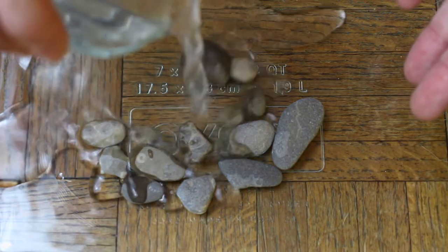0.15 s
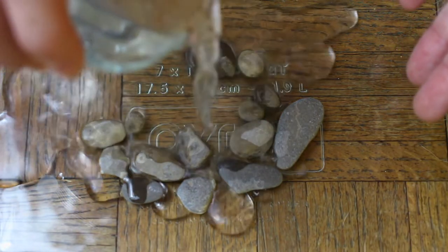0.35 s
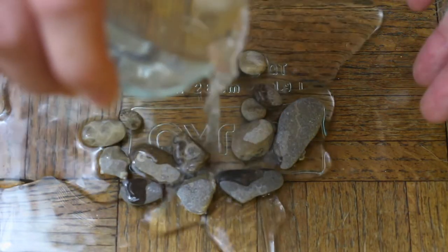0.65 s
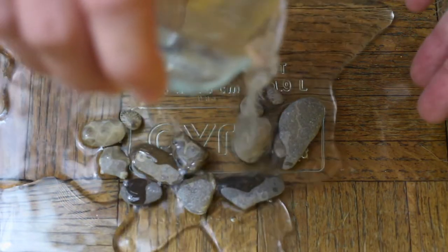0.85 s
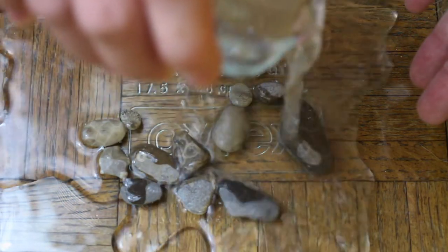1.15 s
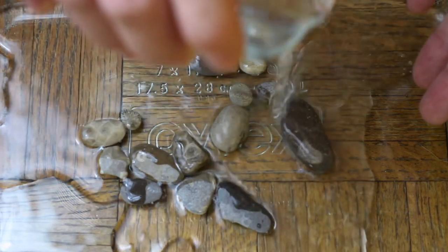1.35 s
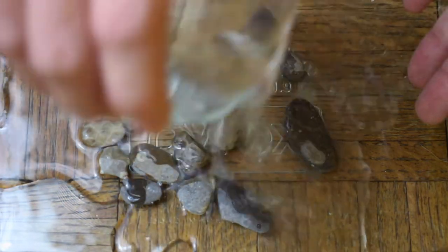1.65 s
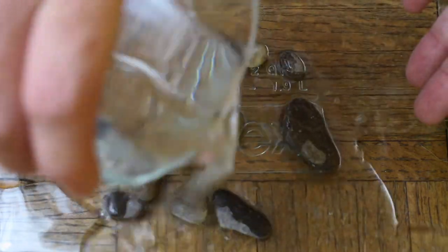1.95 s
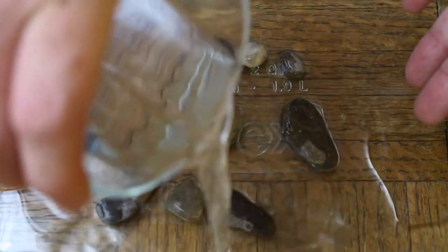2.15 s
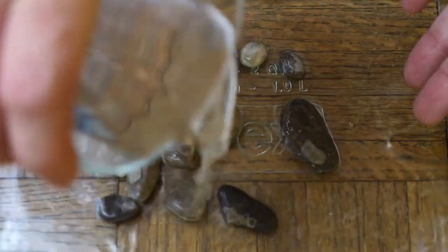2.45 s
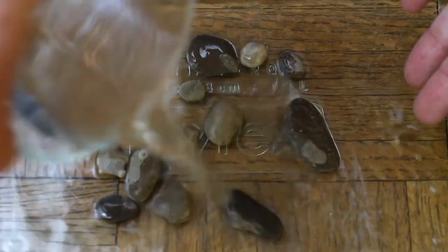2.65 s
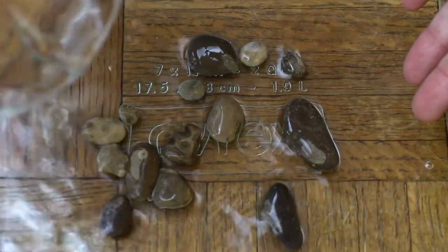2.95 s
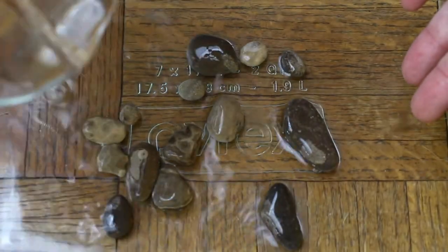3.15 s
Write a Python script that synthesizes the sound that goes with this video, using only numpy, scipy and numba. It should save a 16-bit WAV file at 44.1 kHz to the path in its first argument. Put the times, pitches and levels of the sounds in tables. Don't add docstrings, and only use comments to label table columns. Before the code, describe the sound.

Pebbles clink and knock in a glass dish as poured water splashes over them, close up indoors

```python
import sys
import numpy as np
from scipy import signal
from scipy.fft import rfft, irfft
from scipy.io import wavfile
from scipy.ndimage import uniform_filter1d
from numba import njit

SR = 44100
rng = np.random.default_rng(int(sys.argv[2]) if len(sys.argv) > 2 else 0)


def voltage_ratio(level):
    return 10 ** (np.asarray(level, float) / 20)


def wav_out(sig):
    wavfile.write(sys.argv[1], SR, np.round(np.clip(np.atleast_2d(sig).T, -1, 1) * 32767).astype(np.int16))


N = 145530
TOP_HZ = 15900


def unit(x):
    return x / np.sqrt(np.mean(x ** 2))


def walk(rate_hz):
    hold = int(SR / rate_hz)
    steps = np.repeat(rng.standard_normal(N // hold + 1), hold)
    return unit(uniform_filter1d(uniform_filter1d(steps, hold), hold)[:N])


def colour(x, points):
    hz, db = np.array(points, float).T
    bin_hz = np.arange(N // 2 + 1) * SR / N
    return irfft(rfft(x) * voltage_ratio(np.interp(np.log(bin_hz + 1), np.log(hz), db)), N)


def ring(x, hz, width_hz, wander=0):
    turn = np.exp(2j * np.pi * hz * np.cumsum(1 + wander + 0 * x) / SR)
    decay = np.exp(-np.pi * width_hz / SR)
    return (signal.lfilter([1], [1, -decay], x / turn) * turn).imag


def clicks(rate_hz, spread_db):
    chance, size, sign = rng.random((3, N))
    return unit((chance < rate_hz / SR) * voltage_ratio(-spread_db * np.log(size + 1 / 100)) * np.sign(sign - .5))


@njit
def grains(start, hz, cycles, glide, size, length):
    out = np.zeros(length)
    for k in range(len(start)):
        n, phase, a = cycles[k] * SR / hz[k], 0., size[k]
        fade = np.exp(-1 / n)
        for i in range(min(int(6 * n), length - start[k])):
            out[start[k] + i] += a * np.sin(phase) * min(1., 5 * i / n)
            phase += 2 * np.pi * min(hz[k] * (1 + glide[k] * i / n) / SR, .45)
            a *= fade
    return out


# start in
# seconds, peak in dB, spot (0 back to 2 front), skid in seconds.
KNOCKS = [(0.0667, -13, 0.17, 0.027), (0.0784, -17, 0.082, 0.003), (0.1258, -21, 0.046, 0.014),
          (0.169, -18, 0.067, 0.01), (0.191, -19, 0.13, 0.017), (0.2234, -13.5, 0.067, 0.0061),
          (0.2711, -11, 0.067, 0.0033), (0.2967, -12.5, 0.065, 0.0047), (0.3147, -13.5, 0.2, 0.015),
          (0.4533, -15, 0.12, 0.013), (0.5277, -16, 0.085, 0.0099),
          (0.77, -14, 0.18, 0.011), (0.7931, -15, 1.2, 0.027), (0.8222, -6.5, 0.13, 0.013),
                 (0.8504, -6, 0.19, 0.012), (1.061, -11.5, 1.13, 0.02), (1.0796, -15.5, 1.06, 0.023),
                 (1.1014, -11.5, 0.97, 0.0096), (1.1164, -11, 0.97, 0.036), (1.1692, -12.5, 1.2, 0.0033),
                 (1.3971, -6, 0.9, 0.035), (1.415, -11, 0.55, 0.0036), (1.4294, -9, 0.81, 0.028),
                 (1.5387, -16.5, 1.26, 0.029), (1.5799, -12, 1.44, 0.018), (1.6377, -31, 2.2, 0.0071),
                 (1.6545, -8, 0.58, 0.018), (1.67, -11, 0.92, 0.018), (1.707, -13.5, 0.51, 0.0089),
          (1.8867, -19, 6.4, 0.012), (1.9188, -17.5, 1.6, 0.0076), (2.0797, -13, 1.4, 0.016),
               (2.1256, -11, 1.67, 0.011), (2.15, -14, 2.1, 0.0051), (2.225, -19.5, 1.6, 0.0037),
               (2.2603, -14.5, 1.13, 0.0049), (2.2981, -11, 1.43, 0.0086), (2.3343, -8.5, 1.06, 0.014),
               (2.366, -19.5, 1, 0.025), (2.417, -8, 2.1, 0.041), (2.459, -5, 1.9, 0.023),
               (2.5404, -17, 2.5, 0.013), (2.5709, -14, 2.03, 0.0098), (2.669, -13.5, 1.87, 0.018),
               (2.746, -7, 1.96, 0.0092), (2.7744, -11.5, 0.93, 0.0076), (2.8008, -7, 0.88, 0.033),
               (2.8388, -5, 2.2, 0.011),
          (2.901, -16.5, 0.72, 0.056),
    (2.9297, -13.5, 0.95, 0.032),
]
# start in seconds, peak in dB.
TAPS = [(0.2098, -18.5), (0.2428, -14), (0.355, -16.5), (0.392, -11), (0.4835, -14.5), (0.5192, -11.5),
        (0.6861, -20.5), (0.7195, -25.5), (0.9363, -21), (1, -34), (1.031, -31), (1.2612, -26.5),
        (1.4527, -17), (1.4739, -14.5), (1.492, -18.5), (1.5068, -17), (1.5669, -10.5), (1.691, -18),
        (1.7592, -17), (1.96, -24), (1.9968, -18), (2.0328, -21.5), (2.1869, -21), (2.2064, -24),
        (2.6407, -11.5), (2.6912, -12)]


def pebble_contacts(t):
    s, db, spot, slide_s = np.array(KNOCKS, float).T
    tap_s, tap_db = np.array(TAPS, float).T
    skid_spot, tap_spot = np.interp(t, s, spot), np.interp(tap_s, s, spot)
    s, db = np.r_[s, tap_s], np.r_[db, tap_db - 2.5]
    spot, slide_s = np.r_[spot, tap_spot], np.r_[slide_s, 0.011 + 0 * tap_s]
    return s, db, spot, slide_s, skid_spot


def skid_push(t, skid_db, s, db, slide_s):
    push = voltage_ratio(skid_db - 6.5)
    for start, level_db, hold_s in zip(s, db, np.clip(slide_s, 1e-3, .1)):
        attack = np.clip((t - start) / 0.0044, 0, 1)
        push = push + voltage_ratio(level_db - 12.5) * attack * np.exp(-(np.abs(t - start) / hold_s) ** 2)
    return push


# Hz, width in Hz, level in dB.
SPOT_BACK = [(1930, 260, -5.5), (2876, 52, -8.5), (3850, 29, -8), (5025, 46, 2), (6040, 81, -6.5),
             (7160, 84, -14), (8000, 88, -16.5)]
# Hz, width in Hz, level in dB.
SPOT_MIDDLE = [(1884, 80, -1), (2900, 78, -2.5), (3138, 47, -1), (4616, 36, 1.5), (4840, 86, -1),
               (5750, 30, -3), (6554, 58, -1), (7180, 200, -3.5), (7990, 70, -2.5), (9230, 24, -12.5),
               (10050, 98, -9.5)]
# Hz, width in Hz, level in dB.
SPOT_FRONT = [(1894, 78, 0.5), (3114, 43, 6.5), (4511, 48, -0.5), (5473, 64, -4.5), (6040, 31, -7.5),
              (6980, 69, -8), (10170, 270, -23), (9660, 36, -18), (11300, 80, -16), (14000, 100, -16)]
# Hz, width in Hz, level in dB.
FLEX = [(265.5, 56, -9.5), (749, 116, -5.5), (1087, 26, -1.5), (2194, 135, -0.5)]


def dish_modes(skid, patter, push, skid_spot, at, tick_db, spot):
    knock_db, scatter_db = 2.5, 3
    chance = rng.standard_normal((len(at), 48))
    out, k = np.zeros(N), 0
    for place, modes in enumerate((SPOT_BACK, SPOT_MIDDLE, SPOT_FRONT, FLEX)):
        if place < 3:
            skid_share, knock_share = (
                np.sqrt(np.clip(1 - abs(np.clip(p, 0, 2) - place), 0, 1)) for p in (skid_spot, spot))
        else:
            skid_share, knock_share = (np.mean(push) / push) ** 0.43, 0.3
        for hz, width_hz, mode_db in modes:
            drive = skid * voltage_ratio(3.02 * walk(18)) + patter * voltage_ratio(scatter_db * rng.standard_normal(N))
            drive = drive * 0.14 * skid_share
            knock = voltage_ratio(tick_db + knock_db + scatter_db * chance[:, k]) * np.sign(chance[:, k - 1])
            drive[at] += knock_share * knock
            mode = np.gradient(ring(drive, hz, width_hz, 0.0038 * walk(9))) / np.sin(2 * np.pi * hz / SR)
            out += voltage_ratio(mode_db - 29) * np.sqrt(width_hz) * mode
            k += 1
    return out


# start in seconds, peak in dB, Hz.
CLINKS = [
    (0.0034, -25.5, 3480),
    (2.8976, -11, 4840),
    (3.023, -23.5, 4790),
]


def clinks():
    out = np.zeros(N)
    for s, db, hz in CLINKS:
        out += voltage_ratio(db) * ring(1. * (np.arange(N) == int(s * SR)), hz, 43)
    return out


# Hz, level in dB.
CLATTER_COLOUR = [(600, -18), (2500, -3), (5000, 0), (9000, -9), (16000, -22)]


def clatter(hit_power):
    t60_s = 0.12
    power = signal.lfilter([1], [1, -1e-6 ** (1 / (t60_s * SR))], hit_power)
    return voltage_ratio(-21.5) * np.sqrt(np.abs(power)) * unit(colour(rng.standard_normal(N), CLATTER_COLOUR))


def fine_modes(t, drive):
    count, t60_s = 70, .05
    u = t[:SR // 10]
    pitch, phase, decay = rng.random((count, 3)).T[:, :, None]
    modes = np.sin(2 * np.pi * (TOP_HZ * pitch * u + phase)) * voltage_ratio(-60 * u / (t60_s * (.5 + decay)))
    kernel = modes.sum(0)
    fine = signal.fftconvolve(drive, kernel / np.sqrt(np.sum(kernel ** 2)))[:N]
    return voltage_ratio(-8.5) * colour(fine, CLATTER_COLOUR)


def dish(t, skid_db):
    flooded_s, tick_db_per_s = 2.4, -150
    s, db, spot, slide_s, skid_spot = pebble_contacts(t)
    at = (s * SR).astype(int)
    push = skid_push(t, skid_db, s, db, slide_s)
    skid = clicks(1300, 3.5) * push * voltage_ratio(walk(60))
    patter = clicks(200, 2) * voltage_ratio(skid_db - 5.5)
    tick_db = db + tick_db_per_s * slide_s * np.where(s > flooded_s, 3, .6)
    hit_power = np.zeros(N)
    hit_power[at] = voltage_ratio(tick_db) ** 2
    out = dish_modes(skid, patter, push, skid_spot, at, tick_db, spot) + clinks() + clatter(hit_power)
    return out + fine_modes(t, skid + patter + 5 * np.sqrt(hit_power))


def swarm(rate_hz, low_hz, high_hz, cycles, glide, spread_db):
    when, pitch, length, size = rng.random((int(rate_hz * N / SR), 4)).T
    return unit(grains((when * N).astype(np.int64), low_hz * (high_hz / low_hz) ** pitch,
                       cycles * (.5 + length), glide + 0 * when,
                       voltage_ratio(-spread_db * np.log(size + 1 / 50)), N))


# start in seconds, peak in dB, Hz.
SNAPS = [(0.1705, -5.5, 8660), (0.1914, -10, 8820), (0.2857, -31, 12100), (0.3144, -18, 9660),
         (0.3426, -17.5, 12500), (0.3739, -17, 10000), (0.395, -17, 10700), (0.414, -20, 10400),
         (0.454, -16.5, 12000), (0.478, -23, 10200), (0.5111, -13.5, 10300), (0.5822, -19.5, 9450),
         (0.6303, -21, 10500), (0.79, -25, 8500), (0.803, -29, 10200), (0.8884, -25, 13700),
         (0.974, -13.5, 12400), (1.1618, -18, 10400), (1.186, -27, 9170), (1.2271, -34, 14800),
         (1.2615, -22, 9180), (1.3049, -14.5, 11200), (1.3278, -22, 12900), (1.357, -27, 12500),
         (1.3725, -15, 15700), (1.3911, -26, 10200), (1.43, -11, 9180), (1.497, -14.5, 11100),
         (1.524, -19, 14000), (1.6212, -56, 14900), (1.6362, -14.5, 11100), (1.6681, -25, 10200),
         (1.7062, -13, 11540), (1.7619, -15, 11400), (1.881, -25, 9900), (1.9765, -21.5, 13300),
         (2.0052, -19, 12000), (2.0308, -20, 11100), (2.046, -20, 11200), (2.0572, -20, 9200),
         (2.139, -20, 13200), (2.6404, -26, 9980), (2.832, -13.5, 9500), (2.8664, -14, 9520),
         (3.1448, -34.5, 10800)]


def snaps():
    spread_s, cycles = .002, 3
    s, db, hz = np.array(SNAPS, float).T[:, :, None]
    delay, pitch, size = rng.random((len(s), 3, 5)).transpose(1, 0, 2)
    start = ((s + spread_s * delay ** 2) * SR).astype(np.int64)
    ring_hz = np.clip(hz * 1.64 ** (2 * pitch - 1), 4e3, 16e3)
    level = voltage_ratio(db + 1 - 2.5 * size)
    flat = 0 * delay.ravel()
    rings = grains(start.ravel(), ring_hz.ravel(), cycles + flat, flat, level.ravel(), N)
    puff = np.zeros(N)
    puff[(s * SR).astype(int)] = voltage_ratio(db - 14)
    hiss = unit(colour(rng.standard_normal(N), [(2500, -40), (7000, 2), (16000, 4)]))
    return rings + hiss * signal.lfilter([1], [1, -np.exp(-1 / (0.0046 * SR))], puff)


# start in seconds, peak in dB, nominal Hz (the chirp starts at 0.85 of it).
BUBBLES = [(0.313, -15, 1600), (0.577, -28, 240), (0.49, -13, 1900), (0.526, -6.5, 2500), (0.41, -12, 4100),
           (0.458, -15, 1900), (2.258, -32, 2500), (1.4145, -7, 5100), (1.4, 0.5, 4900), (1.6, -6, 5200),
           (2.109, -12, 1790), (2.807, -10, 1880), (2.959, -15.5, 1150), (3.009, -10, 2400),
           (3.041, -22, 2100)]


def large_bubbles():
    s, db, hz = np.array(BUBBLES, float).T
    return grains((s * SR).astype(np.int64), .85 * hz, 7.4 + 0 * s, 0.103 + 0 * s, voltage_ratio(db - 6.0), N)


# time in seconds, level in dB.
GURGLE = [
    (1.17, -73),
    (1.2, -42.5),
    (1.38, -38.5),
    (1.41, -77),
]


def gurgle(t):
    pocket_hz = 2394
    level_db = np.interp(t, *np.array(GURGLE).T)
    return swarm(170, 0.95 * pocket_hz, 1.01 * pocket_hz, 7.4, 0.0091, .6) * voltage_ratio(level_db)


def water(t, flow_db, spray_db):
    fizz_hz = 2600
    spray = swarm(260, 5150, 18800, 3.0, 0.078, 3.5) * voltage_ratio(spray_db - 7.5 + walk(16.3))
    fizz = swarm(150, fizz_hz / 2, fizz_hz * 2, 5, 0.06, 3) * voltage_ratio(flow_db - 13)
    return spray + fizz + snaps() + large_bubbles() + gurgle(t)


# time in seconds, pebble skid level in dB, spray level in dB.
SKID = [(0, -47, -31), (0.048, -43, -60), (.18, -28, -28.5), (.53, -26.5, -62), (0.601, -33.5, -36),
        (0.758, -38.5, -49), (0.899, -31, -31.5), (1.202, -46, -34.5), (1.38, -37, -39), (1.5, -31, -36),
        (1.76, -27, -55), (1.819, -36.5, -41), (2.45, -37.5, -67), (2.949, -24, -54), (3.0, -38.5, -40),
        (3.3, -113, -83)]


def pour(t):
    s, skid_db, spray_db = np.array(SKID, float).T
    skid_db, spray_db = np.interp(t, s, skid_db), np.interp(t, s, spray_db)
    return dish(t, skid_db) + water(t, skid_db, spray_db)


def room_echo(t, near):
    t60_s = .16
    u = t[:SR // 2]
    echo = rng.standard_normal((2, len(u))) * 0.0015 ** (u / t60_s) * (u > .003)
    return [signal.fftconvolve(near, e / np.sqrt(np.sum(e ** 2)))[:N] for e in echo]


# time in seconds, Hz, level in dB.
ENGINE = [
    (2.399, 84.7, -110),
    (2.45, 88.9, -50.5),
    (2.6, 99.6, -48.5),
    (2.901, 95.7, -49.5),
    (3.02, 80.6, -49),
    (3.3, 74.9, -50),
]


def engine(t):
    s, hz, db = np.array(ENGINE, float).T
    phase = 2 * np.pi * np.cumsum(np.interp(t, s, hz) * (1 + 0.015 * walk(13))) / SR
    level = voltage_ratio(np.interp(t, s, db, left=-80) + 3)
    return level * (np.sin(phase) + voltage_ratio(-4.5) * np.sin(2 * phase))


# Hz, level in dB per Hz.
ROOM = [(20, -3.5), (45, -2), (70, -6.5), (220, -5.5), (500, -13), (3000, -25), (16000, -31.5)]


def room_noise():
    return unit(colour(rng.standard_normal(N), ROOM)) * voltage_ratio(-44.5 + .5 * walk(4.2))


def background(t):
    return engine(t) + room_noise()


def scene():
    t = np.arange(N) / SR
    near = pour(t)
    wet_mid, wet_side = room_echo(t, near)
    mid = near + voltage_ratio(-13) * wet_mid + background(t)
    side = voltage_ratio(-38.5) * wet_side + voltage_ratio(-32) * background(t)
    return np.array([mid + side, mid - side])


def band_limit(x):
    return signal.sosfilt(signal.butter(12, 16820, fs=SR, output="sos"), x)


def record(dry):
    low_pass = signal.cheby1(10, 1, TOP_HZ, fs=SR, output="sos")
    mix = signal.sosfilt(low_pass, dry)
    return band_limit(mix)


dry = scene()
out = record(dry)
wav_out(out)
```